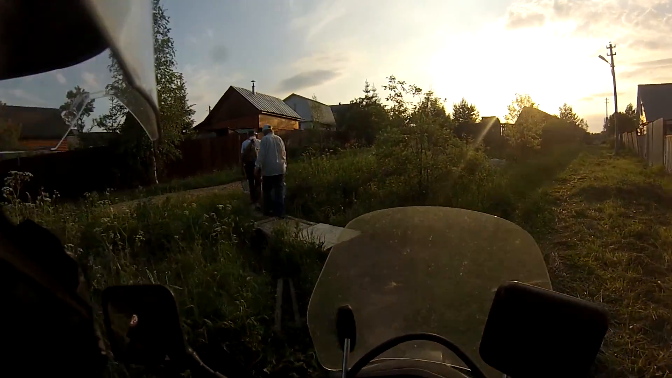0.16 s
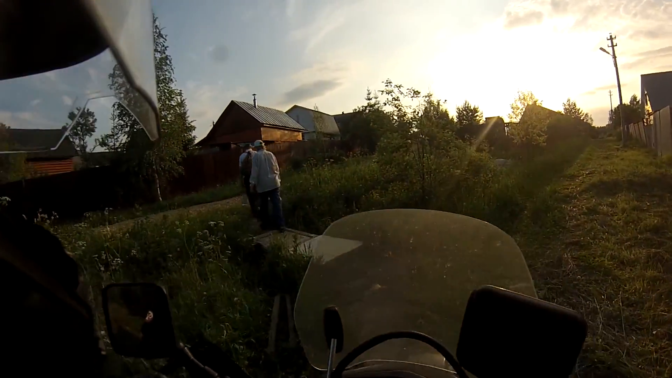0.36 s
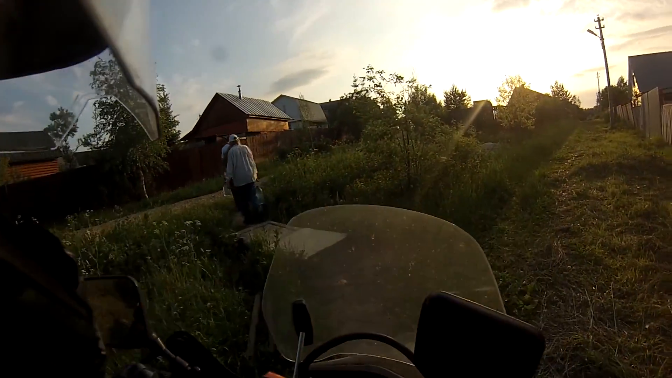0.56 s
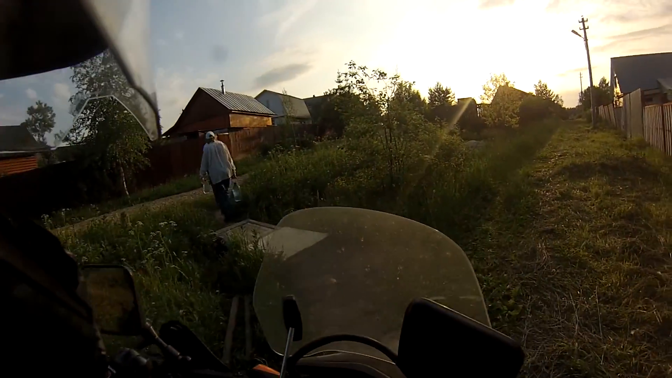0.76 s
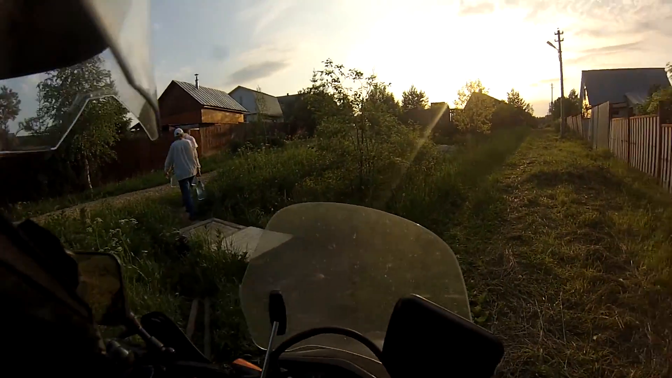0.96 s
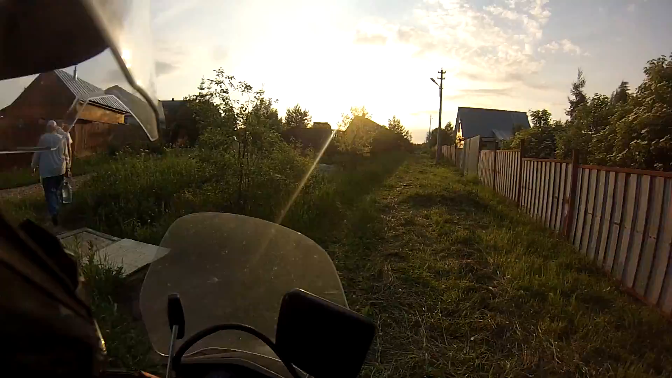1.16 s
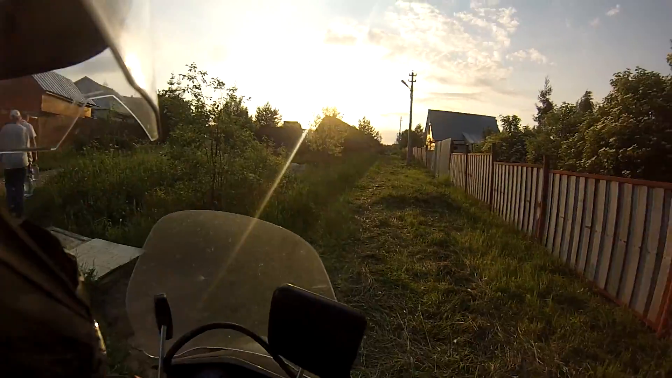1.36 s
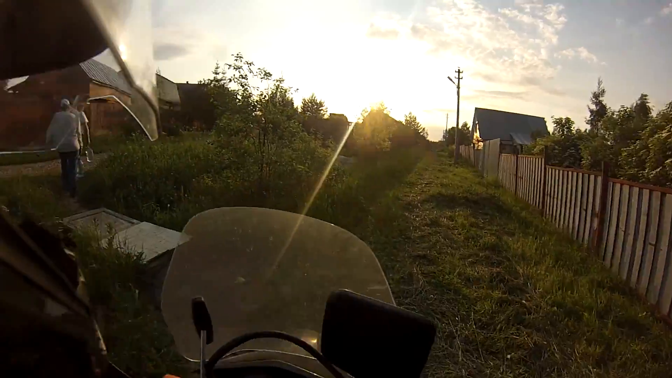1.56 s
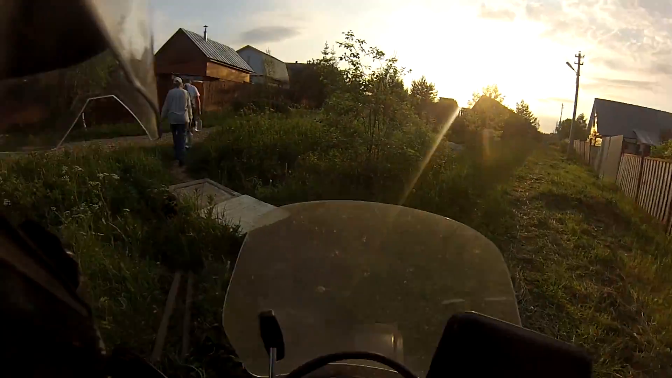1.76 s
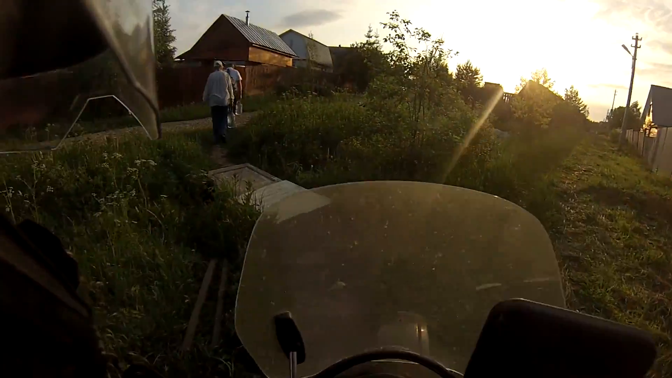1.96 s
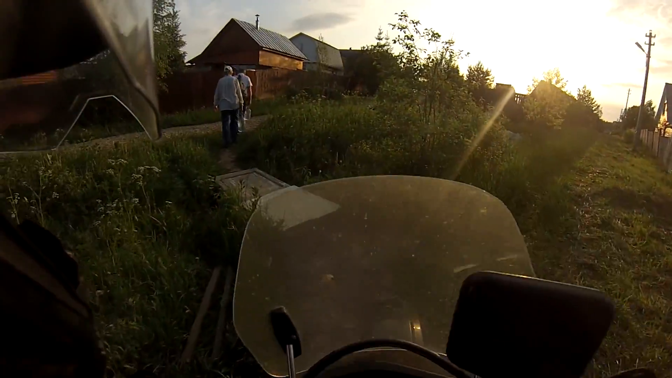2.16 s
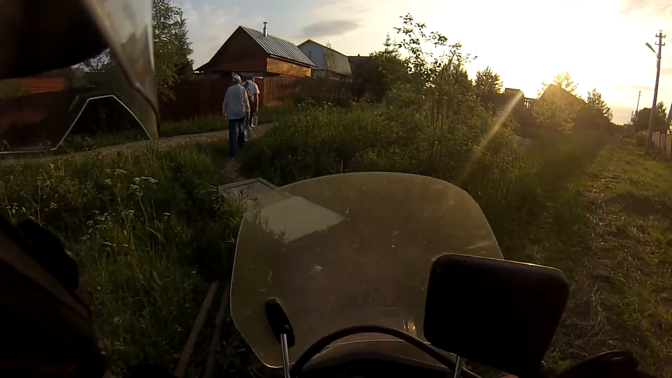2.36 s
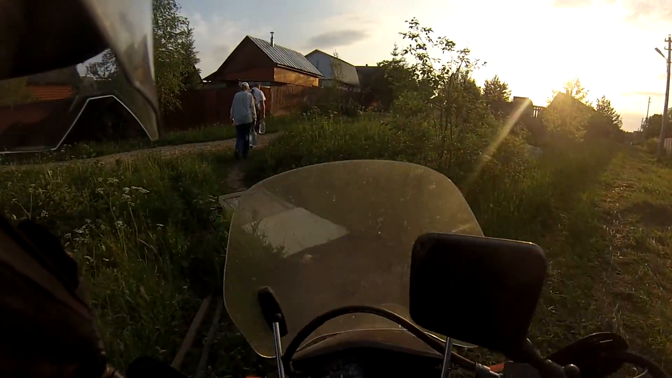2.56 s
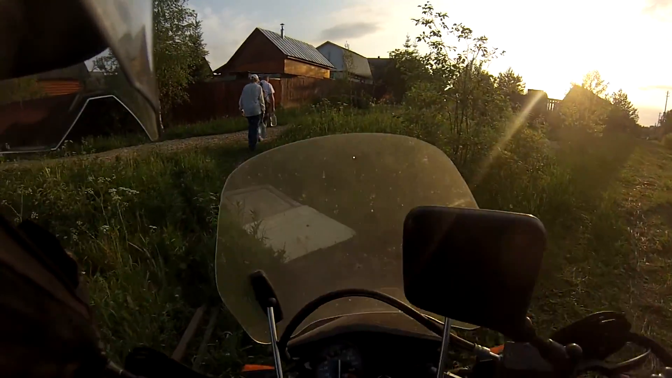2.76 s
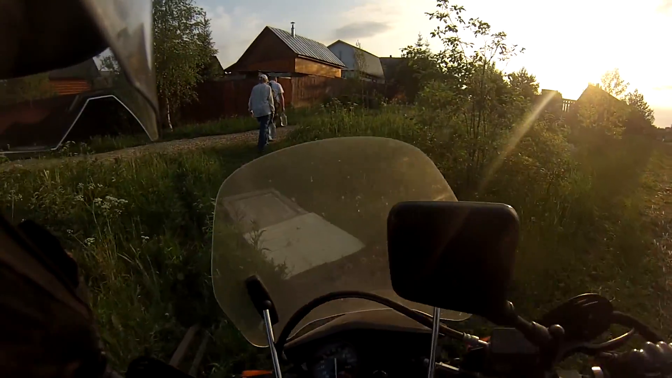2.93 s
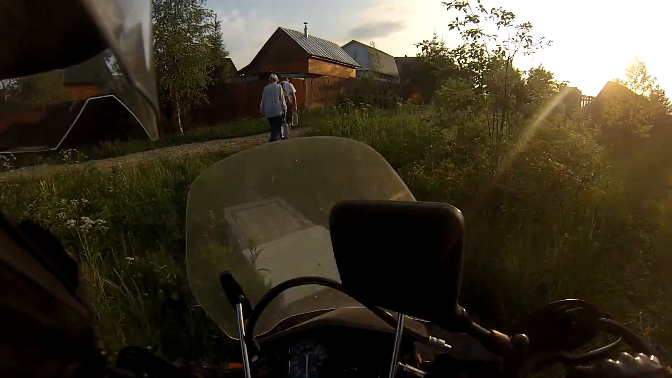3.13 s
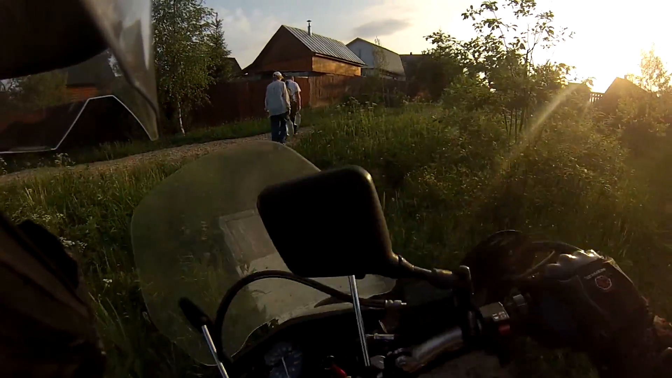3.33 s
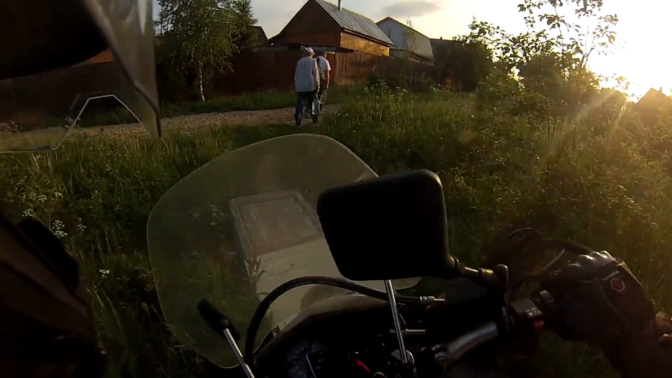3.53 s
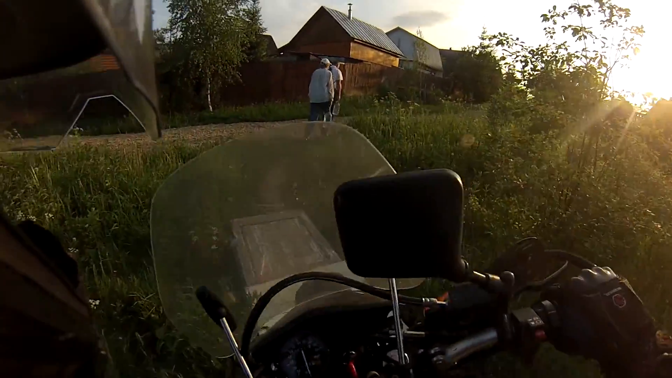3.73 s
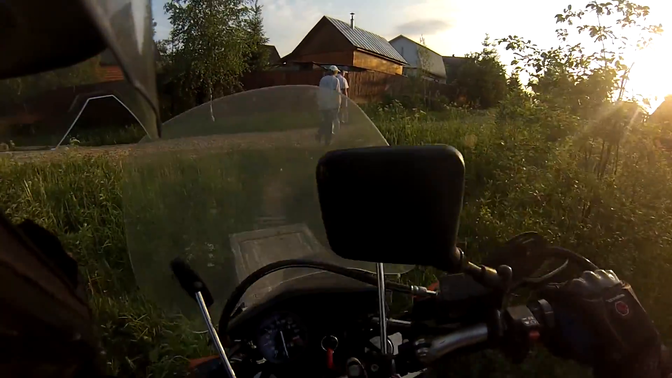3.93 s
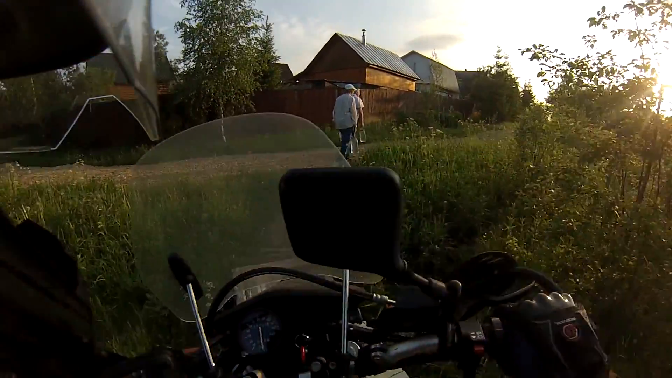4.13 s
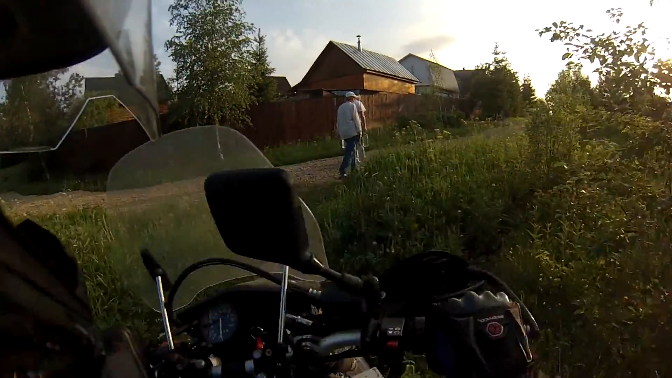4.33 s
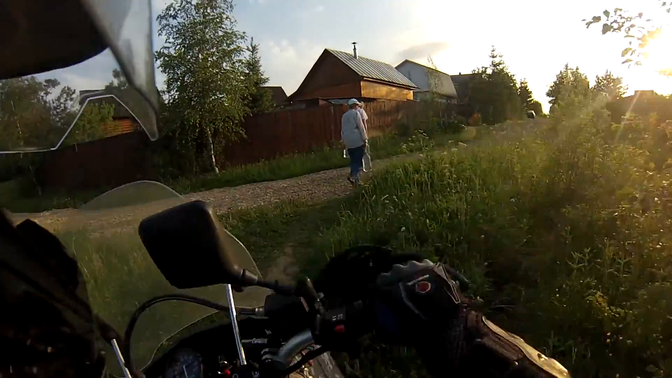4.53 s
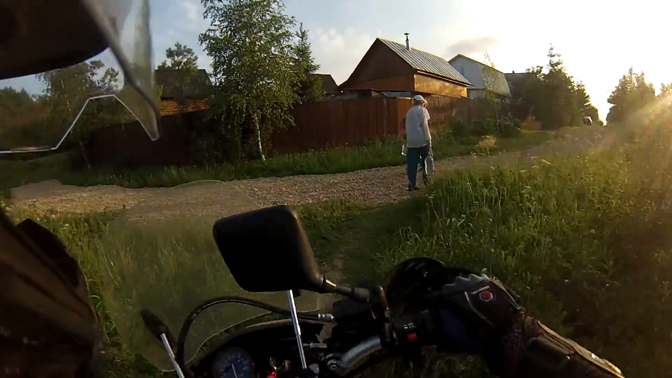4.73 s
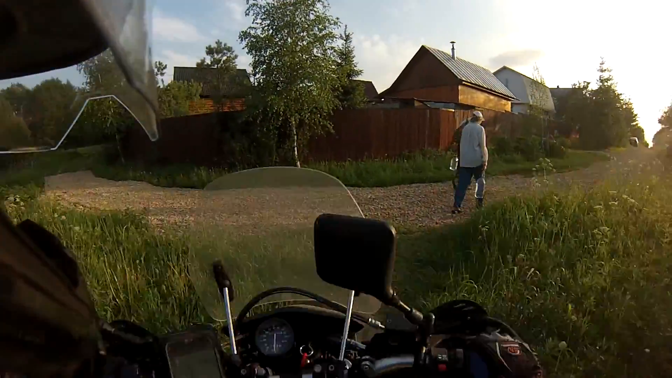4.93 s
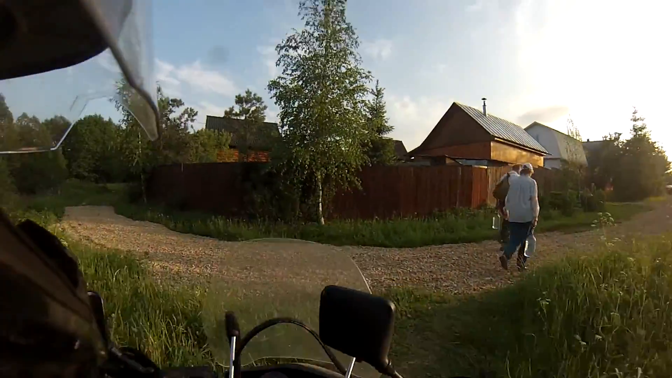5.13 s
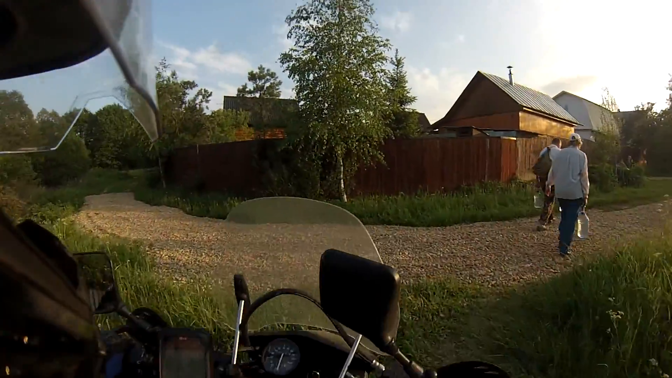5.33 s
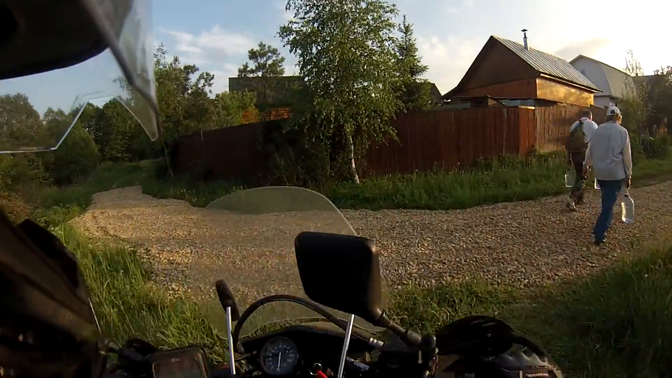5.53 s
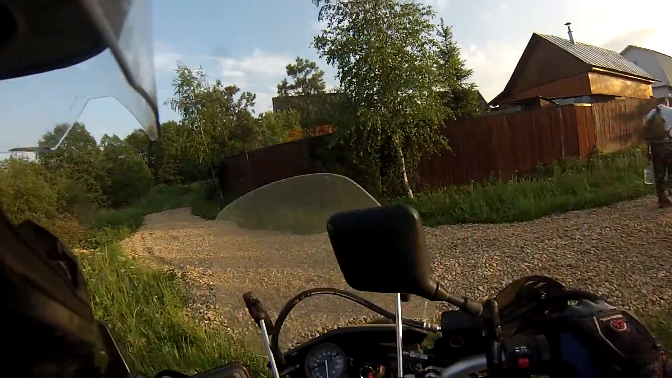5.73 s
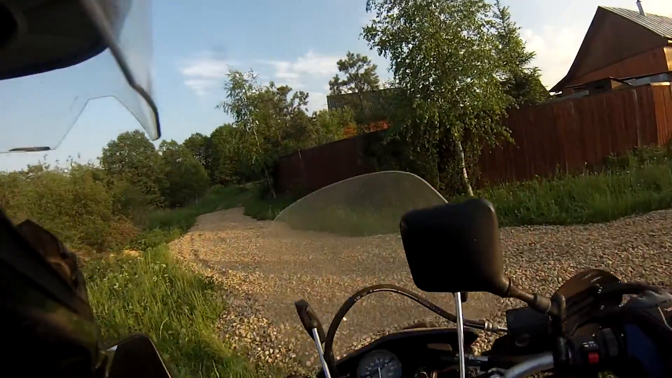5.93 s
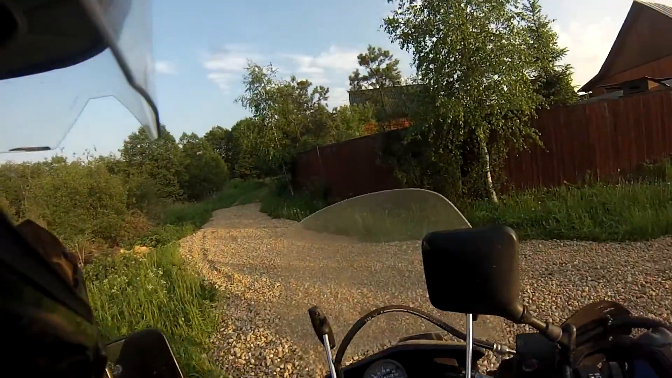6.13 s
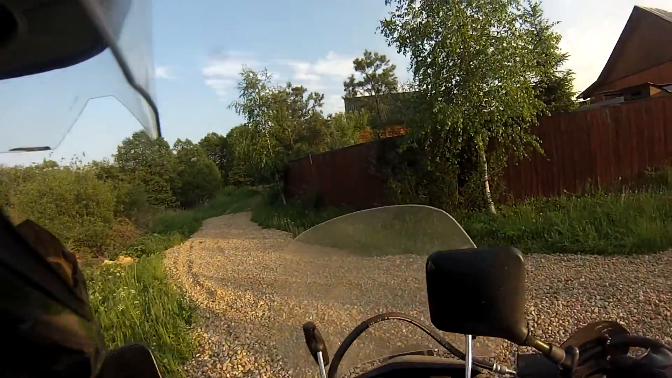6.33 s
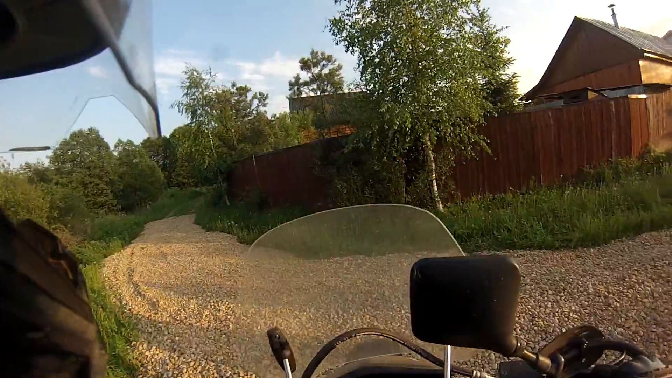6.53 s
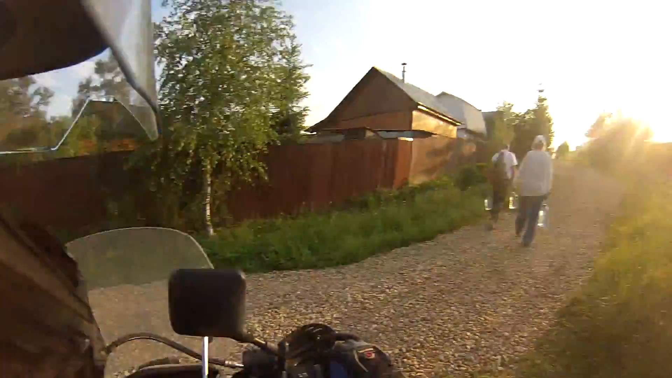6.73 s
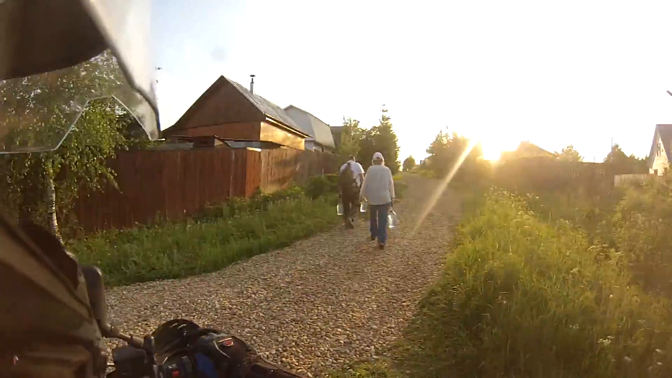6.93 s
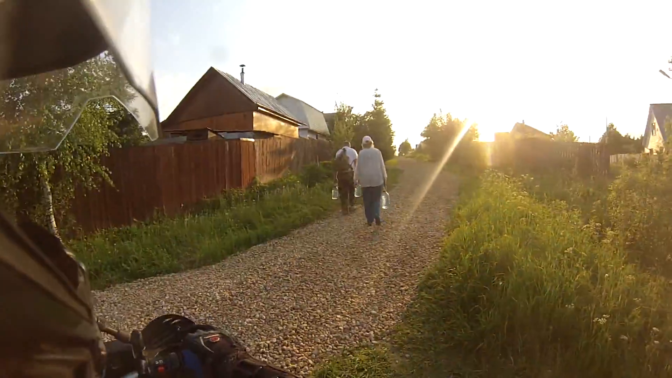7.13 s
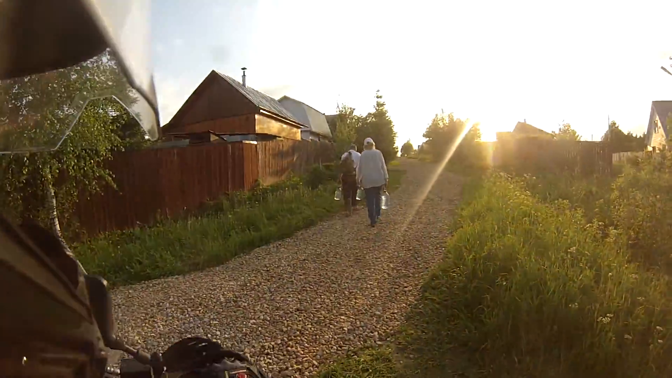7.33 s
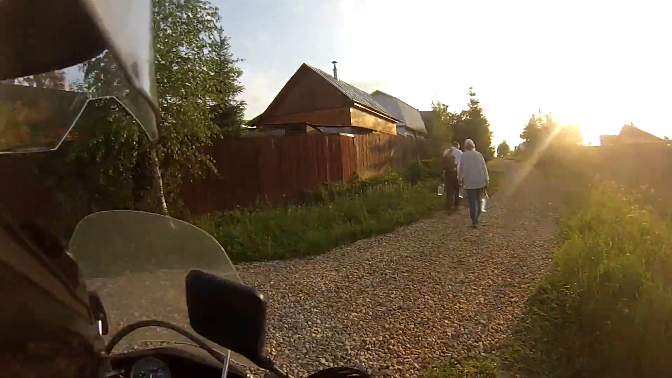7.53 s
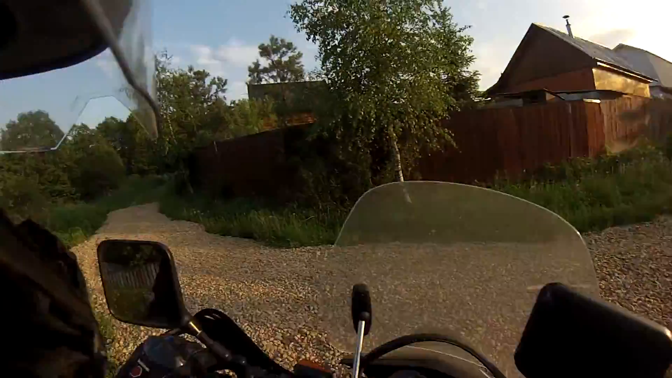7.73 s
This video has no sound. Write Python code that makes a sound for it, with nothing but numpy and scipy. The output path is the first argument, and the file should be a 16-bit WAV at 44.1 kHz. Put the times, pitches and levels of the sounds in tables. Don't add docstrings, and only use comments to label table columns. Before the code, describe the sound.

Heard from the rider's helmet, a slow motorcycle engine putters, surges briefly, and settles, with low wind thuds, sharp knocks, cloth rubbing and faint grasshoppers.

```python
import sys
import numpy as np
from scipy import signal
from scipy.fft import rfft, irfft
from scipy.io import wavfile
from scipy.ndimage import uniform_filter1d

SR = 44100
rng = np.random.default_rng(int(sys.argv[2]) if len(sys.argv) > 2 else 0)


def persist_wave(psi):
    counts = np.round(np.clip(psi, -1, 1) * 32767).astype(np.int16)
    wavfile.write(sys.argv[1], SR, np.atleast_2d(counts).T)


def linear_from_db(decibels):
    return 10 ** (np.asarray(decibels, float) / 20)


N = 343539


def evened(x):
    return x / np.sqrt(np.mean(x ** 2) + 1e-20)


def curves(rows):
    times, *columns = np.transpose(rows)
    t = np.arange(N) / SR
    return [np.interp(t, times, column) for column in columns]


def wander(hz):
    lowpass = signal.butter(2, hz, fs=SR, output="sos")
    return evened(signal.sosfilt(lowpass, rng.standard_normal(N)))


def coloured(points):
    hz, db = np.transpose(points)
    log_f = np.log(np.fft.rfftfreq(N + 1, 1 / SR) + 1)
    gain = linear_from_db(np.interp(log_f, np.log(hz), db, left=-90, right=-90))
    spectrum = rfft(rng.standard_normal(N + 1)) * gain
    return evened(irfft(spectrum, N + 1)[:N])


def resonate(x, hz, bandwidth):
    carrier = np.exp(2j * np.pi * np.cumsum(hz * np.ones(N)) / SR)
    r = np.exp(-np.pi * bandwidth / SR)
    return carrier * signal.lfilter([(1 - r) ** 2], [1, -2 * r, r * r], x / carrier + 1e-18)


def body(x, modes):
    return evened(sum(linear_from_db(db) * evened(resonate(x, hz, 1.45 * bandwidth).real)
                      for hz, bandwidth, db in modes))


def crank():
    # (t/s, f/Hz)
    firing_rate = [(0.0, 13.66), (0.4, 13.88), (0.8, 13.53), (1.1, 13.47), (1.3, 13.91), (1.5, 15.14),
                   (1.7, 16.18), (1.9, 16.74), (2.05, 15.74), (2.2, 15.1), (2.5, 15.19), (2.8, 15.01),
                   (3.0, 15.14), (3.15, 16.46), (3.3, 17.79), (3.45, 15.76), (3.55, 20.14), (3.65, 24.81),
                   (3.8, 25.85), (3.95, 24.8), (4.1, 21.95), (4.22, 20.64), (4.33, 18.66), (4.43, 23.8),
                   (4.55, 25.22), (4.65, 21.34), (4.75, 20.82), (4.85, 15.98), (4.95, 10.99), (5.1, 12.58),
                   (5.3, 12.17), (5.45, 12.68), (5.6, 14.03), (5.75, 14.12), (5.9, 13.24), (6.2, 13.36),
                   (6.5, 13.25), (6.8, 13.96), (7.1, 13.66), (7.4, 13.84), (7.55, 13.27), (7.65, 14.68),
                   (7.8, 15.7)]
    rate, = curves(firing_rate)
    first_turn = -0.698
    return first_turn + np.cumsum(rate) / SR, rate


def beats(turns, phase, spread_db):
    cycle = np.floor(turns - phase)
    passing = np.diff(cycle, prepend=cycle[0]) > 0
    strength = linear_from_db(spread_db * rng.standard_normal(200))
    return passing * strength[cycle.astype(int) + 2]


def gate(turns, phase, length, depth):
    since_opening = (turns - phase) % 1
    return 1 - depth + depth * np.exp(-since_opening / length)


def chamber(firing, rate, modes):
    total = 0
    for hz, t60, db, delay, sign, lift in modes:
        blow = np.roll(firing, round(delay * SR))
        pitch = hz * (rate / 15) ** lift
        total = total + sign * linear_from_db(db) * evened(resonate(blow, pitch, 2.5 / t60).imag)
    return evened(total)


def exhaust(turns, rate):
    # (t/s, thump level/dB, bark level/dB)
    exhaust_levels = [(0.0, -48, -67), (0.04, -42.5, -56.5), (0.45, -43, -61.5), (0.5, -45.5, -54),
                      (0.59, -43, -58), (1.02, -45, -56.5), (1.52, -40, -51.5), (1.95, -38.5, -55),
                      (2.28, -40.5, -53.5), (3.14, -41, -52), (3.19, -35.5, -50), (3.38, -50.5, -60.5),
                      (3.58, -37, -45), (3.64, -44, -46), (3.9, -41, -48), (4.04, -43.5, -46),
                      (4.34, -34, -47), (4.42, -36, -42), (4.6, -42.5, -51), (4.66, -40, -47),
                      (4.71, -32, -47), (4.81, -38.5, -52), (4.9, -47, -72), (5.05, -43.5, -57),
                      (5.08, -53, -60), (5.14, -45, -54), (5.23, -41, -64), (5.6, -43.5, -55.5),
                      (5.71, -42.5, -58), (6.55, -47.5, -55.5), (6.9, -41.5, -53), (6.94, -43.5, -55),
                      (7.07, -38.5, -51), (7.14, -42, -55.5), (7.4, -42.5, -52), (7.53, -44, -55.5),
                      (7.64, -33.5, -52), (7.72, -45.5, -49), (7.79, -39, -51)]
    # (f/Hz, t60/s, level/dB, delay after firing/s, sign, power of the speed in the pitch)
    silencer_modes = [(54.2, .11, 2.5, 0.00032, -1.03, 0.043), (93.9, 0.086, 6.5, .0025, -0.91, 0.1),
                      (75.2, 0.12, -6, 0.0027, -1.25, 0.059)]
    pipe_modes = [(222.8, .03, 5, -0.0011, 0.83, 0.2), (186, 0.064, -7.5, -0.0068, 1, 0.33),
                  (284, 0.023, -12, 0.021, 1, 0.076)]
    firing = beats(turns, 0, spread_db=0.37)
    thump = chamber(firing, rate, silencer_modes)
    bark = chamber(firing, rate, pipe_modes)
    bark = evened(bark / np.sqrt(uniform_filter1d(bark ** 2, 9000) + 0.05))
    thump_db, bark_db = curves(exhaust_levels)
    return linear_from_db(thump_db) * thump + linear_from_db(bark_db) * bark


def clatter(turns):
    # (t/s, intake roar level/dB, casing rattle level/dB, chain rattle level/dB, fin hiss level/dB, valve tick level/dB)
    clatter_levels = [(0.0, -63, -53, -78, -65, -71), (0.24, -59.5, -58, -71, -66, -56.5),
                      (0.43, -61, -57.5, -67, -63.5, -54), (0.84, -60, -59.5, -65, -69, -64.5),
                      (1.26, -63.5, -58.5, -65, -67, -55), (1.43, -65.5, -55.5, -65, -66.5, -55),
                      (1.74, -59, -53, -62, -62.5, -50.5), (1.95, -59, -51, -70, -63, -53),
                      (2.26, -63, -56, -64, -63, -43.5), (2.69, -60.5, -55, -72.5, -64.5, -44.5),
                      (3.06, -60, -52.5, -61, -62.5, -42), (3.3, -58.5, -55.5, -61, -60.5, -60),
                      (3.47, -61, -56, -59.5, -62, -63), (3.54, -55, -50.5, -48.5, -60, -40),
                      (3.66, -49.5, -49.5, -52, -56, -50), (3.77, -52, -52, -50.5, -57, -51),
                      (3.93, -48, -46, -50.5, -56, -45), (4.12, -53.5, -51, -48, -56.5, -41.5),
                      (4.34, -55.5, -50, -49, -59.5, -51), (4.49, -52.5, -49, -47.5, -57, -58),
                      (4.64, -52, -51.5, -50, -57, -51), (4.81, -58, -49.5, -57, -58.5, -48),
                      (4.9, -63, -58.5, -65, -70, -56.5), (5.12, -64, -59, -67, -65.5, -63),
                      (5.38, -63, -59, -66, -68.5, -60.5), (5.64, -60.5, -61, -62, -65, -56.5),
                      (5.79, -60, -60, -63, -68, -70), (6.12, -62, -59, -68, -65, -68),
                      (6.33, -65, -61, -74, -68, -72), (6.53, -62.5, -61.5, -67, -67, -63),
                      (6.81, -55.5, -63, -62, -69, -64), (6.99, -61, -60.5, -75, -74, -65),
                      (7.18, -64, -59, -74, -76, -60), (7.33, -62, -52.5, -64, -76, -69),
                      (7.46, -62, -53, -57, -60, -62), (7.59, -58.5, -62, -70, -73, -66),
                      (7.79, -59, -59, -63, -61, -56)]
    # (f/Hz, width/Hz, level/dB)
    intake_modes = [(467, 154, 0.5), (564, 139, -2), (743, 81, 2.5), (950, 126, -1.5)]
    casing_modes = [(1305, 143, -1.9), (1472, 140, -0.12)]
    chain_modes = [(2194, 106, 0.5), (2630, 150, -12.5)]
    fin_modes = [(3105, 203, 0.5), (3535, 260, 0.5), (3875, 174, -1), (4900, 890, 2), (5570, 1000, 2),
                 (6370, 1200, -3.5)]
    grain = np.array([wander(160) for _ in range(4)])
    grit = rng.standard_normal((4, N)) * linear_from_db(2.55 * grain)
    casing_puffs = gate(turns, -0.15, 0.43, 0.5) + gate(turns, 0.17, 0.17, 0.88)
    chain_puffs = gate(turns, 0.18, 0.094, 0.96) + gate(turns, -0.33, 0.08, 0.87)
    fin_puffs = gate(turns, -0.4, 0.15, 0.34) + gate(turns, 0.19, 0.12, 0.24)
    intake = body(grit[0] * gate(turns, -0.06, 0.28, 0.63), intake_modes)
    casing = body(grit[1] * casing_puffs, casing_modes)
    chain = body(grit[2] * chain_puffs, chain_modes)
    fins = body(grit[3] * fin_puffs, fin_modes)
    seat = beats(turns, -0.22, spread_db=7.0)
    seat = seat + 0.32 * np.roll(seat, 440) + 0.27 * np.roll(seat, 800)
    tick = body(seat, [(1478, 107, 18), (1290, 260, -6), (3060, 250, -12)])
    spring = body(beats(2 * turns % 190, 0.2, spread_db=4.0), [(10200, 330, 0)])
    parts = (intake, casing, chain, fins, tick)
    moving = sum(linear_from_db(db) * part for db, part in zip(curves(clatter_levels), parts))
    return moving + linear_from_db(-84) * spring


def wind():
    # (t/s, level/dB)
    buffet_levels = [(0.0, -40.5), (0.37, -44), (0.41, -29), (0.48, -47), (0.54, -38), (0.84, -46.5),
                     (0.87, -41.5), (1.23, -41.5), (1.26, -44), (2.23, -49), (2.28, -47), (2.34, -54),
                     (2.49, -34), (2.58, -42.5), (3.17, -37), (3.21, -26.5), (3.3, -28.5), (3.43, -23),
                     (3.51, -40), (3.82, -35), (3.86, -35), (4.01, -32), (4.19, -34.5), (4.36, -22.5),
                     (4.4, -33), (4.45, -19), (4.53, -36), (4.6, -24), (4.64, -27.5), (4.69, -22.5),
                     (4.79, -35), (4.84, -39), (4.92, -29), (5.01, -42), (5.16, -32), (5.38, -38.5),
                     (5.47, -38), (5.55, -48), (5.68, -35), (5.97, -29), (6.01, -53), (6.07, -30.5),
                     (6.18, -42), (6.42, -25.5), (6.51, -38), (6.59, -37), (6.72, -41), (6.77, -29),
                     (7.03, -48), (7.07, -31), (7.14, -44.5), (7.59, -36.5), (7.64, -30), (7.68, -36.5),
                     (7.79, -37)]
    # (f/Hz, level/dB)
    gust_spectrum = [(8, -11.5), (18, -1.5), (30, -4), (45, -11), (70, -16), (120, -37), (300, -51),
                     (1000, -62)]
    lumps = linear_from_db(2.1 * wander(8.4))
    buffet_db, = curves(buffet_levels)
    return linear_from_db(buffet_db) * evened(coloured(gust_spectrum) * lumps)


def grasshoppers():
    # (t/s, level/dB)
    rasp_levels = [(0.0, -76), (0.02, -84), (0.22, -74), (0.35, -84), (0.37, -66), (0.54, -71), (0.6, -82),
                   (0.65, -69), (0.82, -71), (0.84, -83), (0.91, -70), (1.08, -71), (1.13, -86),
                   (1.17, -69), (1.28, -78), (2.21, -80), (2.28, -68), (2.56, -83), (2.58, -70),
                   (2.69, -72), (2.73, -85), (2.78, -69), (2.95, -71), (2.97, -84), (3.06, -68),
                   (3.08, -84), (3.12, -68), (3.32, -80), (4.12, -75), (4.32, -70), (4.34, -82),
                   (4.45, -67), (4.56, -70), (4.58, -81), (4.69, -69), (4.88, -70), (4.92, -84),
                   (4.97, -72), (5.14, -62), (5.16, -78), (5.9, -76), (6.01, -82), (6.25, -70), (6.33, -82),
                   (6.42, -70), (6.59, -71), (6.62, -84), (6.75, -80), (6.81, -67), (6.86, -81),
                   (6.94, -69), (7.55, -79), (7.64, -68), (7.66, -76), (7.79, -78)]
    strokes = np.cumsum(38 * (1 + 0.28 * wander(6))) / SR
    scrape = rng.standard_normal(N) * gate(strokes, 0, 0.32, 0.91)
    rasp_db, = curves(rasp_levels)
    return linear_from_db(rasp_db) * body(scrape, [(13800, 1100, -2.2), (14360, 1000, 0.17)])


def background():
    # (f/Hz, level/dB)
    hush_spectrum = [(71, -24), (120, -0.5), (150, -18), (235, -16.5), (384, -24), (1480, -23),
                     (1930, -31.5), (2180, -23.5), (3710, -36.5), (14000, -40.5), (15800, -64)]
    return linear_from_db(-51.5 - 4.0) * coloured(hush_spectrum)


def ring(modes):
    t = np.arange(round(0.08 * SR)) / SR
    wave = sum(linear_from_db(db - 60 * t / t60) * np.sin(2 * np.pi * hz * t) for hz, db, t60 in modes)
    return wave / abs(wave).max()


def knocks():
    # (t/s, crack level/dB, liner level/dB, shove level/dB)
    blows = [(0.389, -42.5, -52, -31), (0.4979, -30, -48, -33), (0.8684, -50, -55, -32),
             (1.1228, -50, -52, -44), (3.1694, -47, -51, -35), (3.2097, -30.5, -42, -34),
             (4.2338, -44, -40, -30), (4.2597, -26.5, -33, -22.5), (4.334, -34.5, -35, -22),
             (4.3835, -43, -46, -30), (4.6428, -44, -33.5, -37), (4.6572, -43, -30, -33),
             (4.6637, -53, -29, -33), (5.1052, -45.5, -51, -34.5), (5.137, -28, -33, -38),
             (5.1684, -54, -44, -32), (5.599, -50, -51, -39), (6.1532, -44, -57, -43),
             (6.3071, -45.5, -56, -41), (6.7337, -47, -54, -42), (7.0694, -60, -54, -30),
             (7.6268, -44, -46, -25), (7.6336, -21.5, -45, -28), (7.7338, -50, -58, -42)]
    # (f/Hz, level/dB, t60/s)
    shell_modes = [(1380, 2, 0.015), (1724, -1, 0.012), (2150, -2, 0.015), (2774, -4, .02),
                   (4700, -7, 0.0089), (6540, -10, 0.0065), (8180, -14, 0.0063), (11500, -19, 0.0048)]
    liner_modes = [(307, 0.5, 0.031), (493, -1, 0.027), (678, -3, 0.024)]
    out = np.zeros(N + SR)
    u = np.arange(3500) / 420.0
    shove = (1 - u / 2) * u * np.exp(1 - u)
    for s, crack_db, liner_db, shove_db in blows:
        side, shift, tilt = rng.uniform(-1, 1, 3)
        crack = ring([(hz * (1 + 0.079 * shift), db + 3 * tilt * (-1) ** k, t60)
                      for k, (hz, db, t60) in enumerate(shell_modes)])
        liner = ring([(hz * (1 + 0.19 * tilt), db, t60) for hz, db, t60 in liner_modes])
        at = round(s * SR)
        out[at:at + len(crack)] += linear_from_db(crack_db + 8.5) * crack + linear_from_db(liner_db + 6.5) * liner
        out[at:at + len(shove)] += np.sign(side) * linear_from_db(shove_db - 4) * shove
    return out[:N]


def collar():
    # (t/s, rub level/dB, sizzle level/dB)
    head_turns = [
        [(6.77, -74, -85), (6.802, -41, -52), (6.83, -40, -50.5), (6.974, -39, -56), (7.02, -79, -88)],
        [(7.24, -64, -81), (7.276, -46.5, -78), (7.488, -41.5, -52.5), (7.552, -46, -56), (7.58, -60, -80)],
    ]
    # (f/Hz, width/Hz, level/dB)
    rub_modes = [(572, 59, -12.5), (1324, 104, 6.5), (1450, 89, -8), (2300, 210, -13.5), (2540, 250, -31)]
    sizzle_modes = [(4800, 530, 3.5), (5240, 680, -4), (6500, 410, 2), (11700, 620, -7)]
    slips = rng.standard_normal(N) * linear_from_db(1.63 * wander(59))
    rub = body(slips, rub_modes)
    sizzle = body(slips * linear_from_db(-2.0 * wander(65)), sizzle_modes)
    out = np.zeros(N)
    for rows in head_turns:
        start, end = round(rows[0][0] * SR), round(rows[-1][0] * SR)
        rub_db, sizzle_db = curves(rows)
        drag = linear_from_db(rub_db) * rub + linear_from_db(sizzle_db) * sizzle
        out[start:end] += drag[start:end] * signal.windows.tukey(end - start, 0.1)
    return out


def scene():
    turns, rate = crank()
    engine = exhaust(turns, rate) + clatter(turns)
    surroundings = wind() + grasshoppers() + background()
    helmet = knocks() + collar()
    return (engine + surroundings + helmet)[None]


def band_limit(x):
    return signal.sosfilt(signal.butter(12, 16440, fs=SR, output="sos"), x)


def record(dry):
    return band_limit(dry)


dry = scene()
out = record(dry)
persist_wave(out)
```